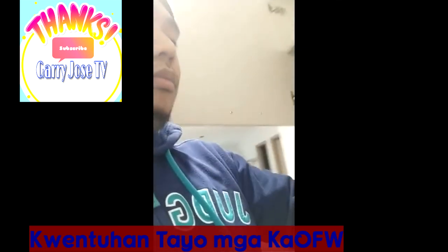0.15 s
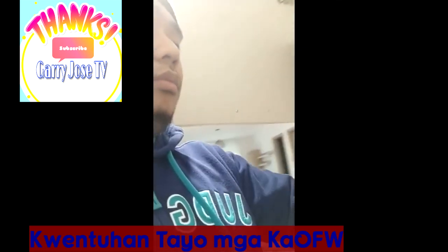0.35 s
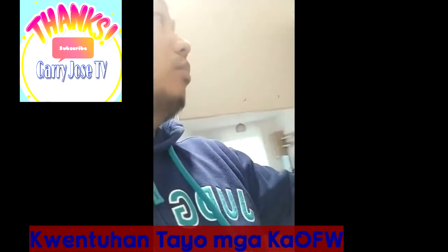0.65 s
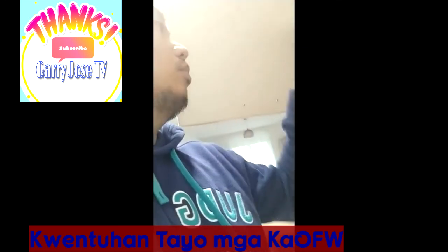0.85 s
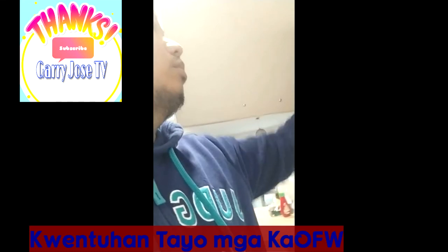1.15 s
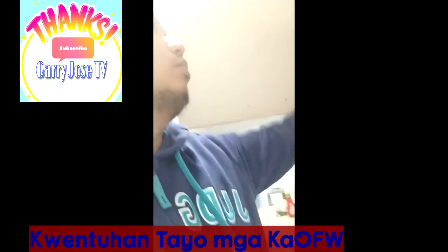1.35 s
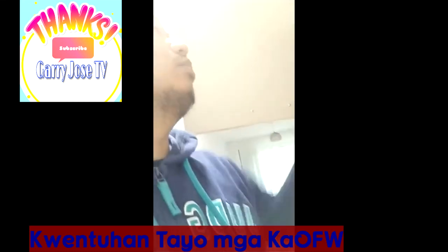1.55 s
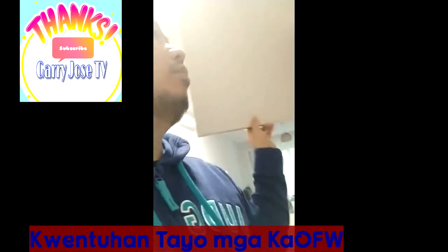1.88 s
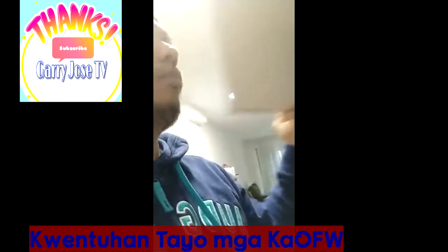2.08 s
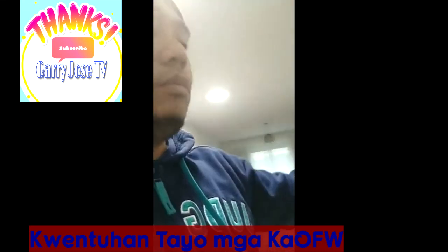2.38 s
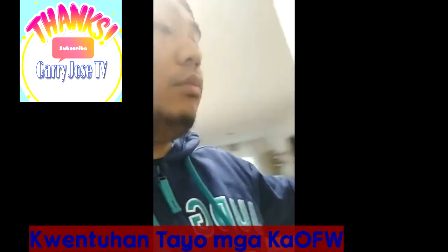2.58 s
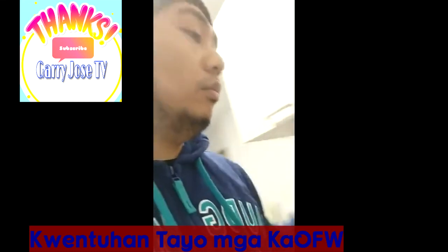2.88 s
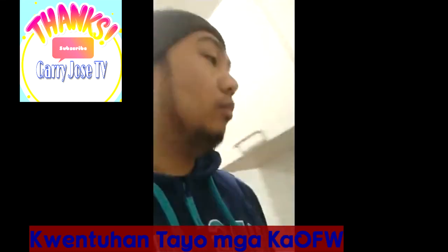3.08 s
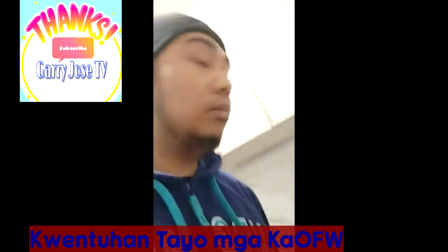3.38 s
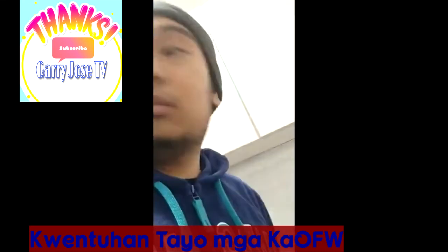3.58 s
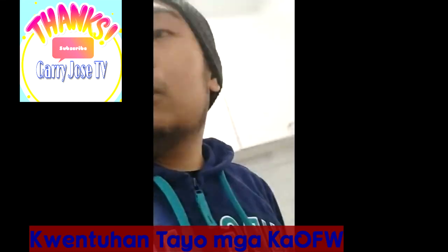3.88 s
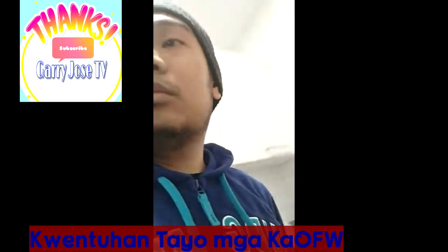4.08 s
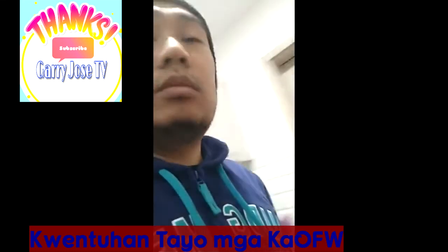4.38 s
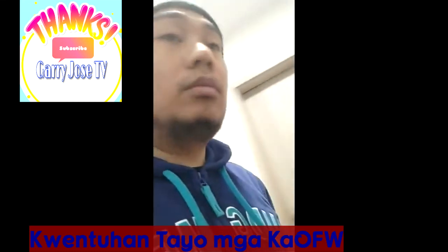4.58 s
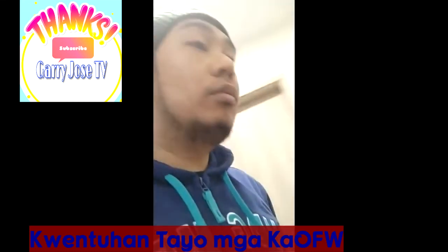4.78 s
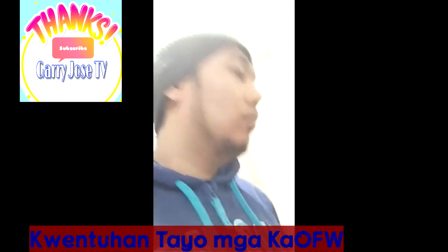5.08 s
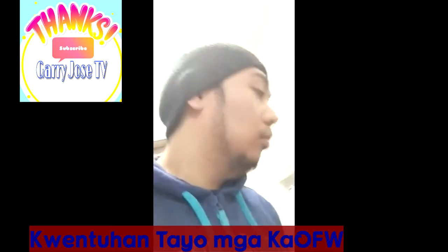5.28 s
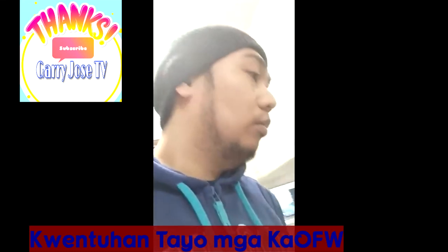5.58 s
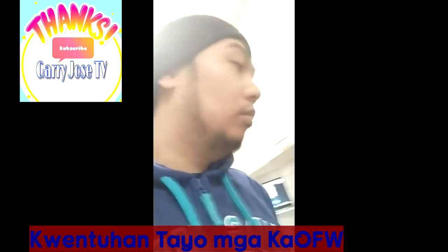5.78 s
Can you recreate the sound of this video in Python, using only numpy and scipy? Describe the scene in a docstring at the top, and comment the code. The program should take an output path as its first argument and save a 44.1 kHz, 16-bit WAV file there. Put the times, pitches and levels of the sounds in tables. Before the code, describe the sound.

A small, hard-surfaced kitchen heard through a close handheld microphone, with low room rumble, soft hiss and faint ticks. At about 0.65 seconds a wooden door lands in its frame with a dull, quick double thump and short woody ring. Light clicks and a slight handling wobble follow around 1.2 to 1.4 seconds. At 2.16 seconds a second door knocks louder and sharper, its catch snapping brightly, then chatters; a deep boom swells beneath, and looser rattles around 2.44 fade by about 2.8. A faint appliance hum emerges near 3 seconds. From then on sweatshirt fabric rustles in fluttering strokes, with a very thin, high gliding swish around 3.3 to 3.7. Low, damped bumps of the hand come between 3.7 and 4.0. Rustling grows busier from 4.3 to 5.2, with small clicks, and crisper ticks and a last brush arrive near 5.7 to 5.9.

```python
"""Two wooden doors are shut in a bare kitchen, close by: blows shake the frame and ring panel modes.
The first lands with a dull double thump; the second knocks, clicks its catch, rattles and pumps a low boom.
A sweatshirt rustles by the microphone as fluttering noise, with a thin gliding swish.
Faint clicks are resonant noise bursts; the hand bumps the camera as low damped wobbles and pats.
Behind them lie room rumble, microphone hiss and a faint appliance hum."""
import sys
import numpy as np
from scipy import signal
from scipy.io import wavfile
from scipy.ndimage import uniform_filter1d

SR = 44100
rng = np.random.default_rng(int(sys.argv[2]) if len(sys.argv) > 2 else 0)


def wav_out(sig):
    """Save sig, one row per channel (or a flat mono array), as 16-bit PCM at SR to the path in sys.argv[1]."""
    wavfile.write(sys.argv[1], SR, np.round(np.clip(np.atleast_2d(sig).T, -1, 1) * 32767).astype(np.int16))


N = 261954
TIME = np.arange(N) / SR
AGE = np.arange(int(1.5 * SR)) / SR  # time axis of one blow, click or bump


def gain_of(db):
    """Decibels to amplitude."""
    return 10 ** (np.asarray(db) / 20)


def unit(x):
    """Scales to an energy of one."""
    return x / np.sqrt(np.sum(x ** 2) + 1e-20)


def rms_one(x):
    """Scales a full-length signal to an rms of one."""
    return np.sqrt(N) * unit(x)


def read(points, hz):
    """Interpolates a table on a log-frequency axis."""
    f, value = np.transpose(points)
    return np.interp(np.log(hz + 1), np.log(f + 1), value)


def level(s, db):
    """A dB curve as a gain at every sample, silent outside its span."""
    return gain_of(np.interp(TIME, s, db, left=-np.inf, right=-np.inf))


def add(mix, s, sound):
    """Mixes a sound in at time s."""
    part = mix[max(round(s * SR), 0):][:len(sound)]
    part += sound[:len(part)]


def colour(x, spectrum, tilt_db=0, size=8192):
    """Minimum-phase filter of unit energy with the given spectrum, tilted above 250 Hz."""
    hz = abs(np.fft.fftfreq(size, 1 / SR))
    octaves = np.log2(np.maximum(hz, 250) / 1000)
    log_gain = np.log(gain_of(read(spectrum, hz) + tilt_db * octaves))
    response = np.exp(np.conj(signal.hilbert(log_gain)))
    taps = np.fft.ifft(response).real[:size // 2]
    return signal.oaconvolve(x, unit(taps))[:len(x)]


def noise(spectrum, grain_db=0):
    """Coloured noise of rms one; grain_db makes it gritty."""
    grit = gain_of(grain_db * np.clip(rng.standard_normal(N), -2, 2))
    return rms_one(colour(rng.standard_normal(N) * grit, spectrum))


def wander(size):
    """Smoothed random drift of rms one; size is the averaging span in samples."""
    return rms_one(uniform_filter1d(rng.standard_normal(N), size=size))


def patchy(x, depth_db):
    """Random gains, smoothed over time and frequency, make the noise uneven and blotchy."""
    z = signal.stft(x, SR, nperseg=1024)[2]
    over_hz = uniform_filter1d(rng.standard_normal(z.shape), size=5, axis=0)
    patches = uniform_filter1d(over_hz, size=5, axis=1)
    z = z * gain_of(depth_db * patches / patches.std())
    return rms_one(signal.istft(z, SR)[1][:N])


def swells(rows, fade_db_per_s):
    """Each movement builds up, holds and dies away; overlapping ones add in power."""
    power = np.zeros(N)
    for start, rise, hold, db in rows:
        age = TIME - start
        attack = np.clip(age / max(rise, 1e-3), 0, 1)
        fade_db = fade_db_per_s * np.maximum(age - rise - hold, 0)
        power += (attack * gain_of(db - fade_db)) ** 2
    return np.sqrt(power)


def burst(t60):
    """A dense cluster of impulses that dies away."""
    return unit(rng.standard_normal(len(AGE)) * gain_of(-60 * AGE / t60))


def room_tail(stretch=1, build_s=0.0012):
    """Diffuse reflections; each band dies at its own speed."""
    # decay of the room: (frequency [Hz], t60 before stretch [s])
    room_t60 = [(60, 1), (150, 0.44), (300, 0.74), (700, 0.81), (1500, 0.79), (3000, 0.71), (4200, 0.7),
                (6000, 0.59), (12000, 0.21)]
    hz, t, z = signal.stft(rng.standard_normal(len(AGE)), SR, nperseg=512)
    fade = gain_of(-60 * t / (stretch * read(room_t60, hz)[:, None]))
    tail = signal.istft(z * fade, SR)[1][:len(AGE)]
    return unit(tail * (1 - np.exp(-AGE / build_s)))


def ring(modes, tilt_db=0):
    """Damped modes of alternating sign; a harder blow favours the high ones."""
    hz, db, t60 = np.transpose(modes)[:, :, None]
    sign = (-1) ** np.arange(len(modes))[:, None]
    db = db + tilt_db * np.log2(np.maximum(hz, 250)) - 60 * AGE / t60
    return unit(np.sum(sign * gain_of(db) * np.sin(2 * np.pi * hz * AGE), axis=0))


def blow(body, modes, tilt_db, room_db, shake_db, shake_t60, ring_db, stretch, spread_db=1):
    """Contact shakes the frame and rings the panel, varying by blow; the room answers both."""
    contact = signal.unit_impulse(len(AGE)) + gain_of(shake_db) * burst(shake_t60)
    struck = [(hz, db + spread_db * rng.standard_normal(), t60) for hz, db, t60 in modes]
    thud = unit(colour(contact, body, tilt_db))
    tone = gain_of(ring_db) * ring(struck, tilt_db)
    to_room = thud + 0.35 * tone  # the panel feeds the room less than the frame
    room = unit(signal.fftconvolve(to_room, room_tail(stretch))[:len(AGE)])
    return thud + tone + gain_of(room_db) * room


def air(air_db=-63.5, hum_hz=179):
    """Room rumble and microphone hiss as coloured noise; the hum is a sine of drifting phase."""
    # background noise spectrum: (frequency [Hz], relative level [dB])
    air_spectrum = [(12, -31), (20, 5.5), (48, -0.5), (155, -18.5), (309, -15.5), (355, -23), (397, -17.5),
                    (690, -20), (750, -23), (936, -19.5), (2400, -21), (6490, -24), (14100, -25),
                    (14900, -39.5)]
    # appliance hum: (time [s], level [dB])
    hum_level = [(0, -106), (2.602, -84), (3.096, -72.5), (4.5, -79.5), (5.94, -76)]
    drift = np.cumsum(rng.standard_normal(N)) / np.sqrt(SR)
    hum = np.sqrt(2) * np.sin(2 * np.pi * (hum_hz * TIME + 0.75 * drift))
    return gain_of(air_db) * noise(air_spectrum) + level(*np.transpose(hum_level)) * hum


def bumps(t60_s=0.15, pat_db=-5, pat_hz=51, pat_db_per_octave=21, grip_fade_db_per_s=199.5):
    """Fingers push the case: low, quickly damped wobbles and dull pats over a rumble of skin."""
    # unsteady grip: (start [s], rise [s], hold [s], rumble level [dB])
    grip = [(1.68, 0.06, 0.22, -61.5), (3.65, 0.045, 0.33, -64.5), (5.9, .025, .02, -57)]
    # hand shifts: (time [s], wobble level [dB], pitch [Hz])
    shifts = [(1.236, -24.5, 62), (1.264, -26.5, 70), (1.301, -24.5, 58), (1.335, -21, 50),
              (3.678, -20, 32.9), (3.728, -12.5, 32.4), (3.771, -14, 38), (3.835, -13, 42.4),
              (3.858, -23, 67), (3.918, -19, 28.2), (3.966, -15, 28.7), (4.013, -17, 51.6)]
    # spectra: (frequency [Hz], relative level [dB])
    skin = [(15, -4.5), (35, 4.5), (90, -7.5), (150, -10.0), (300, -18.0), (600, -20.0), (2000, -57)]
    dull = [(40, 11.5), (120, -2.5), (190, -11), (280, -20.5), (450, -24), (700, -36), (3000, -44)]
    out = swells(grip, grip_fade_db_per_s) * noise(skin)
    for s, db, hz in shifts:
        share_db = pat_db + pat_db_per_octave * np.log2(hz / pat_hz)  # a quicker push pats more
        pat = unit(colour(burst(t60_s), dull))
        wobble = ring([(hz, 0, t60_s)])
        add(out, s, gain_of(db) * (wobble + gain_of(share_db) * pat))
    return out


def swish(from_s=3.335, to_s=3.705, slow_hz=10300, fast_hz=13400, width_hz=800, db=-65.0):
    """A long slide draws a thin, stuttering swish from the weave; pitch rises and falls with speed."""
    speed = np.sin(np.pi * np.clip((TIME - from_s) / (to_s - from_s), 0, 1))
    turns = np.cumsum(slow_hz + (fast_hz - slow_hz) * speed) / SR
    lowpass = signal.butter(2, width_hz / 2, fs=SR, output="sos")
    fuzz = signal.sosfilt(lowpass, rng.standard_normal(N))
    stutter = gain_of(5 * wander(size=1100))
    carrier = np.sqrt(2 * abs(speed)) * np.sin(2 * np.pi * turns)
    return gain_of(db) * rms_one(fuzz * stutter) * carrier


def cloth(rub_db=-1, flutter_db=0.95, snag_db=1.5, fade_db_per_s=130):
    """Fibres catch and slip: a fine hiss over a softer rub that snags, fluttering together."""
    # sweatshirt strokes: (start [s], rise [s], hold [s], hiss level [dB], rub level before rub_db [dB])
    slides = [(0, 0.0063, 0.0094, -71, -64.5), (1.596, 0.017, 0, -65, -54.5),
              (1.979, 0.016, 0.023, -63, -60), (2.025, 0.022, 0.019, -63, -56.5),
              (2.109, 0.023, 0.024, -54.5, -55), (2.438, 0.026, 0, -50.5, -47),
              (2.538, 0.015, 0.17, -55, -61), (2.754, 0.017, 0, -52.5, -56),
              (2.899, 0.045, 0.0024, -59, -59), (3.353, 0.09, 0.026, -57, -57),
              (3.488, 0.036, 0.0027, -56, -53.5), (3.74, 0.044, 0.0062, -49, -52),
              (3.88, 0.097, 0.022, -66, -64.5), (4.036, 0.033, 0.016, -62.5, -86),
              (4.133, 0.023, 0.029, -68, -65.5), (4.303, 0.019, 0.058, -50, -52),
              (4.516, 0.052, 0.036, -55, -63), (4.617, 0.059, 0.0097, -51.5, -57),
              (4.787, 0.033, 0.067, -59.5, -65), (4.892, 0.032, 0.032, -51, -55.5),
              (4.962, 0.074, 0.047, -54, -55), (5.101, 0.022, 0.057, -61, -54.5), (5.197, .02, 0, -67, -63),
              (5.335, 0.028, 0.13, -64.5, -70), (5.703, 0.0073, 0.023, -53, -64.5),
              (5.756, 0.0073, 0, -43, -72), (5.783, 0.035, 0.071, -56.5, -55)]
    # spectra of hiss and rub: (frequency [Hz], relative level [dB])
    hiss_spectrum = [(880, -16), (1500, -7), (2040, -5.5), (3530, 0.5), (4150, 2.5), (7380, 4), (14000, -2),
                     (14900, -12.5)]
    rub_spectrum = [(100, -17.5), (300, -6.5), (700, -6), (1200, -3), (1900, 4.5), (2900, -0.5), (4500, -8),
                    (9000, -44)]
    start, rise, hold, hiss_level, rub_level = np.transpose(slides)
    hiss_swell = swells(zip(start, rise, hold, hiss_level), fade_db_per_s)
    rub_swell = swells(zip(start, rise, hold, rub_level + rub_db), fade_db_per_s)
    hiss = patchy(noise(hiss_spectrum, grain_db=3), depth_db=2.6)
    rub = patchy(noise(rub_spectrum, grain_db=6), depth_db=3.5) * gain_of(snag_db * wander(size=130))
    return (hiss_swell * hiss + rub_swell * rub) * gain_of(flutter_db * wander(size=500))


def clicks(room_db=-6, rise_s=.002):
    """Small taps: softened noise bursts with room tail, each through one resonance."""
    # faint clicks: (time [s], level [dB], resonance [Hz], burst t60 [s])
    taps = [(0.059, -28, 2400, .06), (0.17, -34.5, 1900, 0.055), (.444, -28.5, 1910, 0.14),
            (0.509, -28, 3100, 0.1), (0.884, -35, 4200, 0.071), (.93, -33, 3480, 0.073),
            (1.15, -35, 1790, 0.092), (1.251, -29, 3310, 0.085), (1.394, -24.5, 1383, 0.17),
            (2.06, -20.5, 3650, 0.2), (3.006, -32, 1830, 0.043), (3.982, -31.5, 2170, .06),
            (4.194, -31.5, 1795, 0.048), (4.314, -22, 2920, 0.47), (5.029, -21, 1620, 0.083),
            (5.176, -27, 1397, 0.093), (5.27, -28.5, 3080, .06), (5.299, -23.5, 1860, 0.073),
            (5.708, -22, 4270, 0.014), (5.7623, -24, 4700, 0.041), (5.769, -19, 4450, .012),
            (5.887, -25.5, 1180, 0.08)]
    out = np.zeros(N)
    for s, db, hz, t60 in taps:
        shape = [(hz / 8, -24), (hz / 1.2, -14), (hz / 1.6, -7), (hz, 0),
                 (hz * 1.21, -7), (hz * 2.4, -17), (hz * 4, -28)]
        dense = burst(t60) + gain_of(room_db) * room_tail(stretch=1.0)
        touch = unit(dense * (1 - np.exp(-AGE / rise_s)))
        add(out, s, gain_of(db) * unit(colour(touch, shape)))
    return out


def boom(rumble_db=-10.0, overtone_db=-21, fade_db_per_s=248):
    """The swinging door pumps a low mode of the room, with looser rumble around it."""
    # pushes of air: (start [s], rise [s], hold [s], level [dB])
    pushes = [(2.16, 0.13, 0.043, -23.5), (2.435, 0.022, 0.012, -31), (2.52, 0.013, 0, -30.5),
              (2.58, 0.018, 0, -31.5), (2.665, 0.019, 0.0076, -34.5), (2.725, 0.021, 0.0014, -31),
              (2.8, 0.015, 0.018, -42), (2.86, 0.012, 0.011, -45.5), (2.94, 0.026, 0.1, -59)]
    # pitch of the mode: (time [s], frequency [Hz])
    pitch = [(2.16, 61.55), (2.25, 55.6), (2.32, 56.6), (2.46, 58.9), (2.62, 55.6), (2.76, 59.9),
             (3.3, 57.3)]
    # (frequency [Hz], relative level [dB])
    spectrum = [(15, -20), (35, 7.5), (75, 9.5), (110, -12), (200, -17.5), (600, -48), (2000, -92.5)]
    turns = np.cumsum(np.interp(TIME, *np.transpose(pitch))) / SR
    overtone = gain_of(overtone_db) * np.sin(4 * np.pi * turns)
    mode = np.sqrt(2) * (np.sin(2 * np.pi * turns) + overtone)
    return swells(pushes, fade_db_per_s) * (mode + gain_of(rumble_db) * noise(spectrum))


def first_door():
    """The door brushes its frame, lands flat on it and later settles with a soft nudge."""
    # blows: (time [s], strength [dB], hardness as treble tilt [dB/octave], room share [dB])
    thumps = [(0.6525, -18.5, 7, 4.5), (0.655, -5, -10.5, -6.5), (0.6602, 2.5, -9, -7.5),
              (0.6657, 1, -5, -10.5), (0.6889, -2, 2, -1), (0.6903, 6.5, 3, -10), (0.6962, 7, -8.5, -10),
              (0.7206, -8.5, 4.5, -8), (0.728, -1, -6.5, -10), (.745, -10.5, -7, -4), (0.7716, -4, -9, -21),
              (.812, -14, -10.5, -3), (1.253, -31.5, -19.5, -5), (1.295, -37, -15, -9)]
    # frame spectrum: (frequency [Hz], relative level [dB])
    body = [(35, -46.5), (70, -15.5), (150, -8), (220, -12.5), (330, 5.5), (450, -7.5), (540, 1),
            (660, -5.5), (860, -10.5), (1020, -4), (1200, -12), (1350, -14.5), (2300, -20.5), (2650, -28),
            (3500, -33), (5600, -42), (14000, -52.5)]
    # panel modes: (frequency [Hz], relative level [dB], t60 [s])
    modes = [(77.3, -10.5, 0.88), (116, -7, 0.45), (162.2, -14.5, .33), (194, -9, 0.3), (256.9, 7, 0.42),
             (294, 6.5, 0.23), (324, 5.5, 0.21), (365.4, -0.5, 0.26), (418.6, 1, 0.18), (516, 2.5, 0.15),
             (559, -3, 0.16), (608, -6, 0.35), (980, 7, 0.083), (1031, 6, 0.056), (1158, 2.5, 0.11),
             (1516, -11.5, 0.13)]
    out = np.zeros(N)
    for s, db, tilt_db, room_db in thumps:
        thump = blow(body, modes, tilt_db, room_db,
                     shake_db=3.5, shake_t60=0.092, ring_db=-1.5, stretch=0.93)
        add(out, s, gain_of(db) * thump)
    return out


def catch(touch_db=-6, seat_s=.0008, rebound_db=-7, rebound_s=0.00139, room_db=-11):
    """A light touch, a hard seat and a rebound, each ringing the catch for a few milliseconds."""
    # catch resonances: (frequency [Hz], width [Hz], relative peak level [dB])
    resonances = [(1210, 220, -9), (2075, 510, -6), (3315, 320, 5), (4430, 230, 3), (5940, 880, -12.5),
                  (9200, 1100, -23.5)]
    # a resonance's width sets its decay
    modes = [(hz, db + 20 * np.log10(width), np.log(1000) / (np.pi * width))
             for hz, width, db in resonances]
    snap = ring(modes)
    out = gain_of(touch_db) * snap
    add(out, seat_s, snap)
    add(out, rebound_s, gain_of(rebound_db) * snap)
    room = unit(signal.fftconvolve(out, room_tail(stretch=0.09))[:len(AGE)])
    return unit(out) + gain_of(room_db) * room


def second_door(room_db=-1.63):
    """The door hits its catch, which clicks and chatters, then rattles in the frame until it settles."""
    # blows: (time [s], strength [dB], hardness as treble tilt [dB/octave], catch click [dB])
    knocks = [(2.1627, 5, 0, 4), (2.1753, 0, -0.5, -18.5), (2.183, 1, -9, -46), (2.191, -7, 0.5, -22),
              (2.2, -4, -13, -46), (2.2227, -1.5, -1.5, -7.5), (2.2255, -2.5, 0, -21),
              (2.237, -1, -3.5, -30), (2.2703, -3.5, -3.5, -12), (2.303, -8, -3.5, -30),
              (2.367, -17.5, 1, -38), (2.4385, -14, 2, -17.5)]
    # rebounds in the frame: (time [s], strength [dB], treble tilt [dB/octave], room share [dB])
    rattles = [(2.4438, -4.5, 2.5, -5), (2.449, -9, -2, -0.5), (2.46, -12, -5.5, 3), (2.5, -16, -6.5, -7),
               (2.572, -17, -2.5, -10), (2.657, -19.5, -2, -11), (2.665, -17.5, 0.5, -5),
               (2.692, -23, -4.5, -7), (2.725, -18.5, -1, -6), (2.742, -19.5, -5, -1),
               (2.831, -31.5, 1.5, 0.5)]
    # frame spectra: (frequency [Hz], relative level [dB])
    knock_body = [(35, -23), (60, -4.5), (110, -3.5), (190, -10.5), (240, -6.5), (440, -8.5), (520, -10.5),
                  (740, -9.5), (930, -5.5), (1100, -11), (1230, -8.5), (1350, -9.5), (1900, -6.5),
                  (2500, -9.5), (3600, -20), (5500, -28.5), (14000, -39.5)]
    rattle_body = [(60, -19), (250, -1), (420, -3.5), (540, -8), (930, -1.5), (1300, -4), (1500, -1.5),
                   (1750, -2), (2200, -7), (2700, -12), (3400, -14.5), (4200, -26), (7000, -38),
                   (14000, -53)]
    # panel modes: (frequency [Hz], relative level [dB], t60 [s])
    knock_modes = [(107, 7.5, 0.59), (141, -1, .45), (165.7, 2, 0.54), (213, 1.5, 0.65), (253.4, -1, 0.39),
                   (324, -7, 0.65), (422.5, -8.5, 0.43), (570, 7, 0.39), (650, 7.5, 0.25),
                   (813, -3.5, 0.39), (936, 12, 0.14), (1106, 4, 0.27), (1228, 12, 0.16), (1832, 6, 0.22),
                   (1940, 5, 0.24), (2300, -2.5, 0.2), (2630, -4, 0.15), (3450, -1, 0.17)]
    rattle_modes = [(218.5, -6.5, 0.43), (267.4, -2, 0.34), (412.3, -1.5, .28), (930, 4, 0.17),
                    (1124, 1, 0.27), (1167, 0, 0.18), (1250, -1, 0.14), (1490, 6.5, 0.11), (1550, 0, 0.18),
                    (2067, -3, 0.11)]
    out = np.zeros(N)
    for s, db, tilt_db, click_db in knocks:
        knock = blow(knock_body, knock_modes, tilt_db, room_db,
                     shake_db=16.0, shake_t60=0.076, ring_db=-3.0, stretch=0.94)
        add(out, s, gain_of(db) * knock)
        add(out, s, gain_of(click_db) * catch())
    for s, db, tilt_db, share_db in rattles:
        rattle = blow(rattle_body, rattle_modes, tilt_db, share_db,
                      shake_db=8.5, shake_t60=0.069, ring_db=-2.5, stretch=1.0)
        add(out, s, gain_of(db) * rattle)
    return out


def scene():
    """Everything reaches one microphone."""
    background = air() + bumps() + swish() + cloth() + clicks()
    doors = boom() + first_door() + second_door()
    return (background + doors)[None]


def record(dry, edge_hz=14300):
    """The recorder's band limit: a linear-phase low-pass."""
    taps = signal.firwin(401, edge_hz, window=("kaiser", 9), fs=SR)
    return signal.oaconvolve(dry, taps[None], "same")


dry = scene()
out = record(dry)
wav_out(out)
```